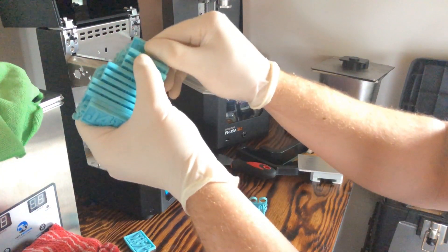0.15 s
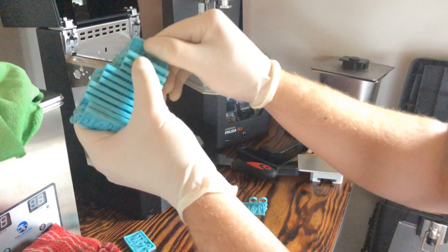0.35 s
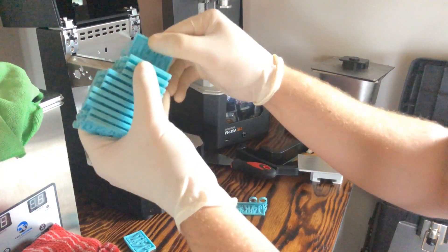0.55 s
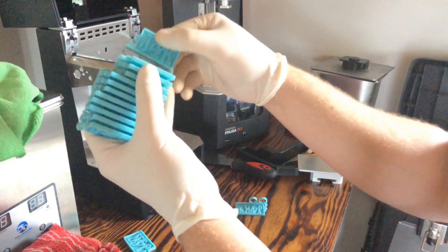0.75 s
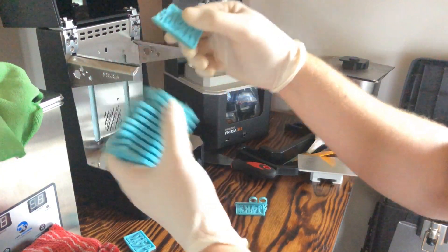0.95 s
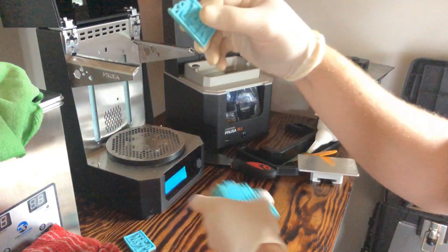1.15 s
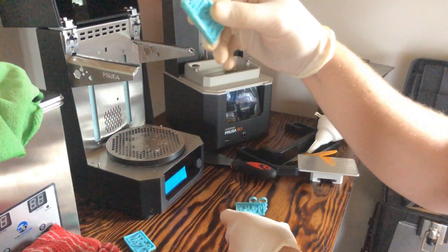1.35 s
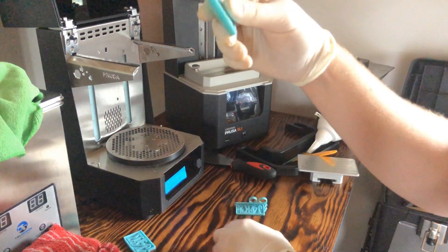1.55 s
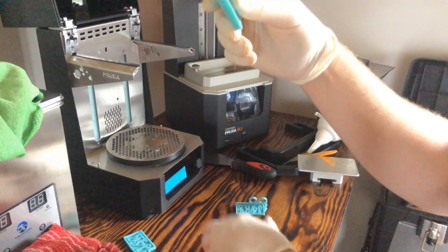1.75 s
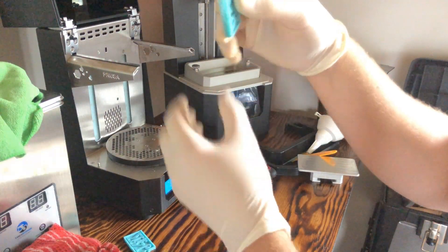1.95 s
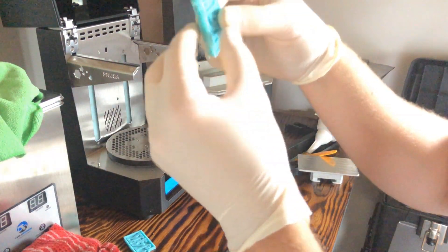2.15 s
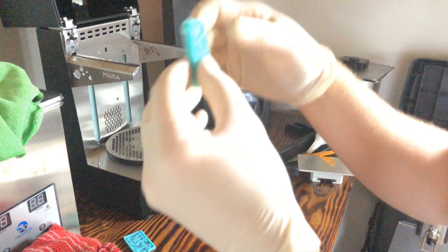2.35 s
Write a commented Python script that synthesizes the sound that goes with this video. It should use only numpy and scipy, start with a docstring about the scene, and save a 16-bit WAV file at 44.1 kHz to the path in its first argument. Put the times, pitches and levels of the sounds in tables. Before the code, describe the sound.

Brittle plastic supports snap off by hand with sharp cracks, then ticks and hollow knocks.

```python
"""Snapping resin supports

Gloved hands break brittle supports off a print: four sharp cracks, thrown back by a small hard workroom.
The loose pieces tick and rub in the gloves, and the rubber blips as a finger slips.
One piece is put down with a few hollow knocks that ring the bench. Room air and a faint hum lie beneath."""
import sys
import numpy as np
from scipy import signal
from scipy.fft import rfft, irfft
from scipy.io import wavfile
from scipy.ndimage import uniform_filter1d

SR = 44100
rng = np.random.default_rng(int(sys.argv[2]) if len(sys.argv) > 2 else 0)


def master_out(mix):
    """Clip the mix to full scale and print it as 16-bit PCM to the path in sys.argv[1]."""
    frames = np.transpose(np.atleast_2d(mix))
    ceiling = np.clip(frames, -1, 1)
    pcm = np.round(ceiling * 32767).astype(np.int16)
    wavfile.write(sys.argv[1], SR, pcm)


N = 105840

# Room decay: freq_hz, t60_s
ROOM_DECAY = [(100, 0.22), (300, 1), (800, 0.66), (2000, 0.88), (4000, 0.59), (7000, 0.56), (10000, 0.43),
              (15000, 0.33)]
# Room air spectrum: freq_hz, density_db
AIR_SPECTRUM = [(18, -48), (32, -18), (55, -3), (130, -3.5), (280, -1), (450, -8.5), (800, -10.5),
                (1500, -14), (3000, -21), (6000, -24.5), (11000, -29), (16000, -25.5)]
# Machine hum: centre_hz, level_db, half_width_hz
HUM_BANDS = [(312, -70, 9.3)]
# Drift of air and hum: time_s, gain_db
BACKGROUND_SWELL = [(0, -2), (.13, -3.5), (.26, -1), (.55, 2), (.9, -0.5), (1.3, 0.5), (1.47, -1),
                    (2, -0.5), (2.4, 0)]
# Gloves rubbing resin: centre_s, half_length_s, level_db, tilt_db_per_oct, ring_hz, ring_db
GLOVE_RUBS = [(0.939, 0.018, -47.5, 1, 10100, 7.5), (1.008, 0.029, -57, -1.5, 2420, 4),
              (1.118, 0.014, -54.5, -0.5, 12000, 5), (1.19, 0.021, -55, 2, 4100, 7),
              (1.267, 0.034, -75, 11.5, 12400, 2), (1.404, 0.013, -56, 1, 2500, 5),
              (1.609, 0.038, -63.5, -3.5, 2220, 4), (2.058, .01, -60.5, 1, 6940, 7),
              (2.136, .01, -63.5, -2, 11000, 10), (2.191, .1, -70, 0.5, 12200, 5),
              (2.37, 0.025, -60.5, 1, 6000, 6)]
# Rub spectrum: freq_hz, gain_db
RUB_SPECTRUM = [(200, -7.5), (1000, -0.5), (2400, 7), (3500, -3), (6000, 1.5), (11000, -3), (16000, -7)]
# Glove rubber letting go: start_s, level_db
GLOVE_PLUCKS = [(0.5613, -41), (1.295, -48.5), (1.318, -52)]
# Splinters, pieces touching: start_s, level_db, tilt_db_per_oct, room_db, ring_hz, ring_db, top_hz
SPLINTER_TICKS = [(0.0763, -19.5, 2.5, -15.5, 4200, 12, 13300), (0.1862, -27, 1, -15, 3840, 9, 16000),
                  (.199, -35, -9.5, -15, 6000, -4, 16000), (0.6527, -9, 6.5, -12, 15300, 6, 17000),
                  (0.9432, -10, -1, -12.5, 11300, 7, 13200), (0.996, -25, -2, -21, 2400, 12, 11000),
                  (1.020, -26, -7, -10, 5500, 9.5, 14100), (1.118, -19, -0.5, -13, 5900, 10.5, 17000),
                  (1.1516, -10, 0.5, -13, 14800, 8, 17000), (1.1848, -23.5, -3, -31, 7770, 5, 16100),
                  (1.2354, -25.5, 1, -17, 11100, 4, 16300), (1.551, -22, -7, -11, 2170, 12, 14000),
                  (1.621, -23.5, -3.5, -3.5, 4200, 4.5, 13740), (1.637, -35.5, 8, -26, 6200, 22.5, 14000),
                  (1.792, -25.5, -1, 0, 5700, 2.5, 16000), (2.3526, -23.5, 0, -11, 5040, 5.5, 16100),
                  (2.3634, -19, 4.5, -17, 11000, -6, 16200)]
# Tick spectrum: freq_hz, gain_db
TICK_SPECTRUM = [(200, -20.5), (1000, -38), (2200, -9.5), (4000, -3), (7000, -1), (11000, 0.5),
                 (15000, 1.5), (16500, -17)]
# Piece put down: start_s, level_db, dull_above_hz, boom_db, clatter_db, hollow_db, room_db
BENCH_KNOCKS = [(1.5506, -13, 1480, 11.5, -1.5, -36.5, -3.5), (1.639, -13.5, 1400, -10, -3, -37, -8.5),
                (1.8219, -13.5, 1380, -3, -5, -39, 1.5), (1.843, 3.5, 4570, 0.5, -3.5, -29.5, -8.5),
                (1.868, -11.5, 4660, 1.5, 5.5, -49, -5)]
# Hollow bench modes: freq_hz, gain_db
BENCH_MODES = [(135, -14), (175, -8), (215, -10.5), (314, -2.5), (500, -12.5), (587, -9.5), (772, -3),
               (809, -2), (1285, -6), (1355, -9), (1491, -8.5), (1810, -1), (2640, -3), (2790, -1.5),
               (3635, -4.5), (4230, -2.5)]
# Clatter spectrum: freq_hz, gain_db
CLATTER_SPECTRUM = [(25, -21.5), (70, -6.5), (200, -1), (450, 1.5), (800, 0), (1080, 1.5), (1400, 3.5),
                    (2200, -3.5), (3000, -0.5), (4300, -6), (6000, -12), (10000, -14), (16000, -16)]
# Supports breaking: start_s, level_db, cutoff_hz, cutoff_order, low_ring_hz, low_ring_db,
# high_ring_hz, high_ring_db, tilt_db_per_oct, crack_s, shiver_db,
# room_db, room_low_hz, room_low_db, room_high_hz, room_high_db
SUPPORT_SNAPS = [(0.2088, 5, 2700, 3.1, 4160, 1, 5800, 4, 2, .0003, -5.5, 2, 5540, 7, 10900, 0.5),
                 (0.3981, 2, 2500, 3, 3660, -2, 12000, 11.5, 0.5, 0.00093, -10.5, -12.5, 3800, 4, 6040, 0),
                 (0.4248, 3, 2500, 1.3, 3900, 7.5, 9560, 10.5, 2.5, 0.00081, -10.5, 1.5, 3980, 4.5, 6400, 1),
                 (0.6519, 6, 2850, 10, 2970, 7, 6650, 6, 1, 0.0024, -1, -8, 3240, 8, 8500, 4.5)]
# Crack spectrum: freq_hz, gain_db
CRACK_SPECTRUM = [(100, -18), (700, -13.5), (1200, -10), (2500, -6.5), (4000, 1), (4700, -4), (6000, -1),
                  (8000, -4.5), (11000, -2), (13000, -8), (15300, -2.5), (16500, -15)]

FFT_SIZE = 8192
HZ = np.fft.rfftfreq(FFT_SIZE, 1 / SR) + 1
T = np.arange(SR) / SR
WALL_DELAY_S, WALL_DB, EARLY_DB, EARLY_DECAY_S = 0.0112, -11, -1.5, 0.014
ROOM_TOP_HZ, LOW_CUT_HZ, HIGH_CUT_HZ, AIR_DB = 15750, 34, 16600, -61
RUB_SLIPS_PER_S, RUB_SPREAD_DB, RUB_ROOM_DB = 4000, 3.5, -7
PLUCK_TOP_HZ, PLUCK_END_HZ, PLUCK_FALL_S, PLUCK_FADE_S, PLUCK_ROOM_DB = 1270, 186, 0.0013, 0.0081, -10.5
BENCH_GAIN_DB, BENCH_T60_AT_1KHZ_S, BENCH_LOW_HZ, BOOM_HZ = -34, 0.115, 55, 290
KNOCK_RISE_S, CLATTER_GAIN_DB, CLATTER_DECAY_S = 0.0018, 9.5, 0.0064
HOLLOW_HZ, HOLLOW_T60_S, HOLLOW_RISE_S = 902, 0.055, 0.004
SNAP_SHIVER_S, BASS_LEAK_DB, SNAP_RING_OCT, ROOM_RING_OCT = 0.0032, -7.5, 0.16, 0.13


def amp(db):
    """Decibels to gain."""
    return 10 ** (np.asarray(db) / 20)


def unit(x):
    """Scale to energy 1."""
    return x / np.sqrt(np.sum(x ** 2) + 1e-20)


def curve(points, hz=HZ):
    """Interpolate a table over log frequency."""
    freq_hz, value = np.transpose(points)
    return np.interp(np.log(hz + 1), np.log(freq_hz), value)


def add(mix, start_s, sound):
    """Mix a sound in at start_s."""
    part = mix[max(round(start_s * SR), 0):][:len(sound)]
    part += sound[:len(part)]


def colour(x, gain_db):
    """Minimum-phase filter, gain_db given on HZ."""
    half = FFT_SIZE // 2
    cepstrum = irfft(np.maximum(gain_db, -100) * np.log(10) / 20)
    cepstrum[1:half] *= 2
    cepstrum[half + 1:] = 0
    response = irfft(np.exp(rfft(cepstrum)))[:half]
    return signal.fftconvolve(x, response)[:len(x)]


def low_pass(x, hz):
    """Steep band limit."""
    return signal.fftconvolve(x, signal.firwin(255, hz, window=("kaiser", 7), fs=SR), "same")


def tilt(db_per_oct):
    """Slope in dB about 7 kHz, flat below 1.5 kHz."""
    return db_per_oct * np.log2(np.maximum(HZ, 1500) / 7000)


def bump(hz, db, width_oct):
    """Broad resonance in dB."""
    return db * np.exp(-(np.log2(HZ / hz) / width_oct) ** 2)


def burst(fast_s, shiver_s, shiver_db):
    """Sudden dense spray, then a short shiver; whitened, energy 1."""
    spray, shiver = rng.standard_normal((2, SR))
    spray = np.sign(spray) * np.exp(-T / fast_s)
    shiver = amp(shiver_db) * shiver * np.exp(-T / shiver_s)
    spectrum = rfft(spray + shiver)
    smooth_power = uniform_filter1d(abs(spectrum) ** 2, size=1500)
    return unit(irfft(spectrum / np.sqrt(smooth_power), SR) * (T < 0.5))


def room(x):
    """The near wall answers first, then a dense tail whose treble dies early."""
    hz, time_s, noise = signal.stft(rng.standard_normal(SR), SR, nperseg=256)
    decay = amp(-60 * time_s / curve(ROOM_DECAY, hz)[:, None])
    tail = signal.istft(noise * decay, SR, nperseg=256)[1][:SR]
    tail = unit(tail * (1 + amp(EARLY_DB) * np.exp(-T / EARLY_DECAY_S)))
    wall = amp(WALL_DB) * burst(fast_s=0.0021, shiver_s=0.0027, shiver_db=-6.5)
    echo = low_pass(signal.fftconvolve(x, tail + wall)[:SR], ROOM_TOP_HZ)
    return np.concatenate([np.zeros(round(WALL_DELAY_S * SR)), echo])[:SR]


def background():
    """Room air and a faint wavering machine hum, both shaped noise."""
    hz = np.fft.rfftfreq(N, 1 / SR)
    bed = amp(AIR_DB) * unit(irfft(rfft(rng.standard_normal(N)) * amp(curve(AIR_SPECTRUM, hz)), N))
    for centre_hz, level_db, half_width_hz in HUM_BANDS:
        hum_spectrum = rfft(rng.standard_normal(N)) / (1 + ((hz - centre_hz) / half_width_hz) ** 2)
        bed += amp(level_db) * unit(irfft(hum_spectrum, N))
    swell = amp(np.interp(np.arange(N) / SR, *np.transpose(BACKGROUND_SWELL)))
    return np.sqrt(N) * swell * low_pass(bed, ROOM_TOP_HZ)


def rub(centre_s, half_length_s, level_db, tilt_db_per_oct, ring_hz, ring_db):
    """Tiny slips swell and fade under a moving finger and ring the piece."""
    slips = rng.standard_normal(SR) * amp(RUB_SPREAD_DB * np.minimum(rng.exponential(1, SR), 4))
    slips *= rng.random(SR) < RUB_SLIPS_PER_S / SR
    shape_db = curve(RUB_SPECTRUM) + tilt(tilt_db_per_oct) + bump(ring_hz, ring_db, width_oct=0.33)
    swell = np.exp(-(T / half_length_s - 3) ** 2)
    stroke = amp(level_db) * np.sqrt(SR) * unit(colour(slips, shape_db)) * swell
    return centre_s - 3 * half_length_s, stroke + amp(RUB_ROOM_DB) * room(stroke)


def pluck(start_s, level_db):
    """Stretched rubber lets go: a soft blip, its pitch dropping as it slackens."""
    pitch_hz = PLUCK_END_HZ + (PLUCK_TOP_HZ - PLUCK_END_HZ) * np.exp(-T / PLUCK_FALL_S)
    fade = np.exp(-(T / PLUCK_FADE_S) ** 2)
    blip = amp(level_db) * np.sin(2 * np.pi * np.cumsum(pitch_hz) / SR) * fade
    return start_s, blip + amp(PLUCK_ROOM_DB) * room(blip)


def tick(start_s, level_db, tilt_db_per_oct, room_db, ring_hz, ring_db, top_hz):
    """A splinter gives way or two pieces touch."""
    click = burst(fast_s=0.00063, shiver_s=0.0053, shiver_db=-12.5)
    click += amp(room_db) * room(signal.unit_impulse(SR))
    shape_db = curve(TICK_SPECTRUM) + tilt(tilt_db_per_oct) + bump(ring_hz, ring_db, width_oct=0.25)
    rolloff_db = -10 * np.log10(1 + (HZ / top_hz) ** 20)
    return start_s, colour(click, level_db + shape_db + rolloff_db)


def bench_mode(hz, gain_db):
    """One damped bench mode; lower modes ring longer."""
    t60_s = BENCH_T60_AT_1KHZ_S * (hz / 1000) ** -0.45
    return amp(gain_db - 60 * T / t60_s) * np.sin(2 * np.pi * (hz * T + rng.random()))


def knock(start_s, level_db, dull_above_hz, boom_db, clatter_db, hollow_db, room_db):
    """A blow rings the bench, with a damped clatter and a hollow tok; boom depends on where it lands."""
    ring = amp(BENCH_GAIN_DB) * sum(bench_mode(*mode) for mode in BENCH_MODES)
    noise = unit(rng.standard_normal(SR) * np.exp(-T / CLATTER_DECAY_S))
    clatter = colour(noise, curve(CLATTER_SPECTRUM) + CLATTER_GAIN_DB + clatter_db)
    blow = (ring + clatter) * (1 - np.exp(-T / KNOCK_RISE_S))
    band_db = -10 * np.log10(1 + (HZ / dull_above_hz) ** 3 + (BENCH_LOW_HZ / HZ) ** 6)
    shelf_db = boom_db / (1 + (HZ / BOOM_HZ) ** 4)
    blow = colour(blow, level_db + band_db + shelf_db)
    tok_envelope = 2 * amp(hollow_db - 60 * T / HOLLOW_T60_S) * (1 - np.exp(-T / HOLLOW_RISE_S))
    direct = blow + tok_envelope * np.sin(2 * np.pi * HOLLOW_HZ * T)
    return start_s, direct + amp(room_db) * room(direct)


def snap(start_s, level_db, cutoff_hz, cutoff_order, low_ring_hz, low_ring_db,
         high_ring_hz, high_ring_db, tilt_db_per_oct, crack_s, shiver_db,
         room_db, room_low_hz, room_low_db, room_high_hz, room_high_db):
    """A support breaks in a spray of micro-fractures; it radiates less below its first bending mode."""
    radiation = amp(BASS_LEAK_DB) + 1 / np.sqrt(1 + (cutoff_hz / HZ) ** (2 * cutoff_order))
    body_db = level_db + curve(CRACK_SPECTRUM) + 20 * np.log10(radiation) + tilt(tilt_db_per_oct)
    rings_db = bump(low_ring_hz, low_ring_db, SNAP_RING_OCT)
    rings_db += bump(high_ring_hz, high_ring_db, SNAP_RING_OCT)
    direct = colour(burst(crack_s, SNAP_SHIVER_S, shiver_db), body_db + rings_db)
    # Other resonances radiate sideways, into the room.
    side_db = bump(room_low_hz, room_low_db, ROOM_RING_OCT)
    side_db += bump(room_high_hz, room_high_db, ROOM_RING_OCT)
    sideways = colour(signal.unit_impulse(SR), body_db + room_db + side_db)
    return start_s, direct + room(sideways)


def scene():
    """Handling sounds over the quiet room."""
    mix = background()
    for source, events in ((snap, SUPPORT_SNAPS), (tick, SPLINTER_TICKS), (knock, BENCH_KNOCKS),
                           (pluck, GLOVE_PLUCKS), (rub, GLOVE_RUBS)):
        for event in events:
            add(mix, *source(*event))
    return mix[None]


def record(dry):
    """Microphone low cut, then a band limit."""
    thinned = signal.sosfilt(signal.butter(2, LOW_CUT_HZ, "high", fs=SR, output="sos"), dry[0])
    return low_pass(thinned, HIGH_CUT_HZ)[None]


dry = scene()
out = record(dry)
master_out(out)
```